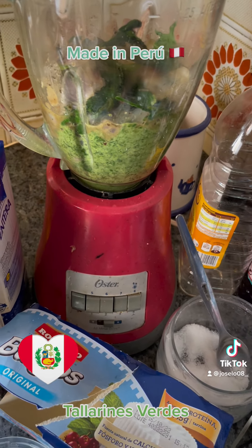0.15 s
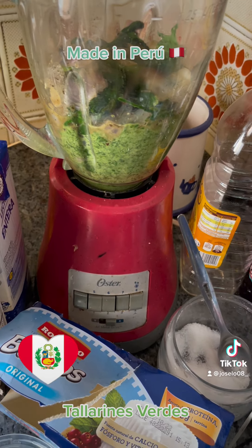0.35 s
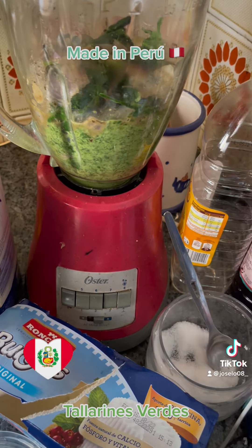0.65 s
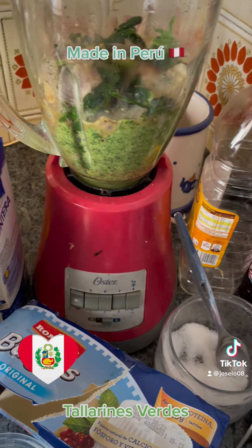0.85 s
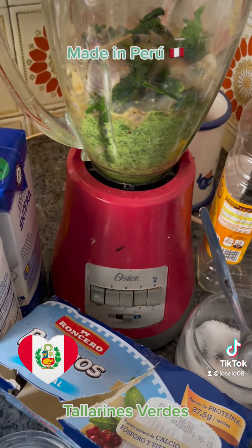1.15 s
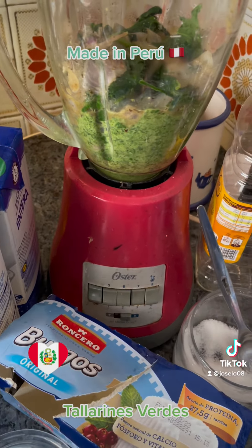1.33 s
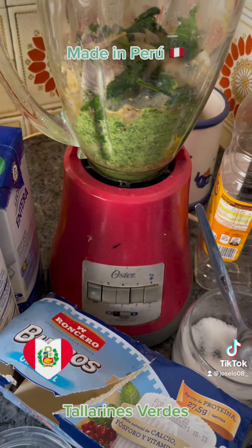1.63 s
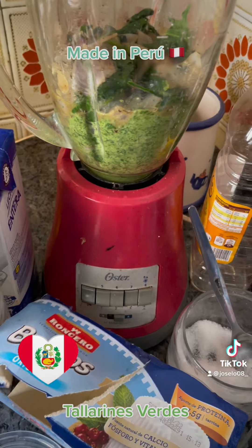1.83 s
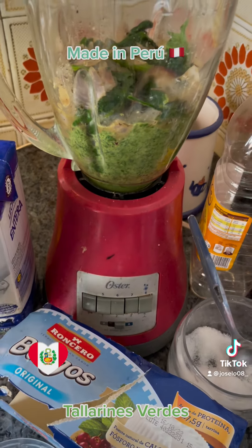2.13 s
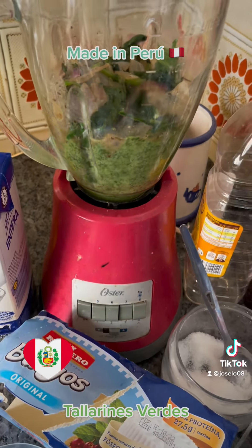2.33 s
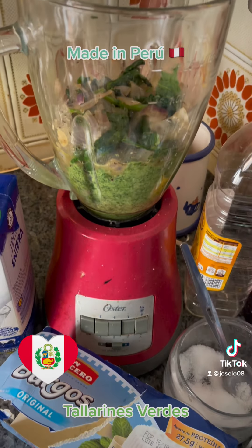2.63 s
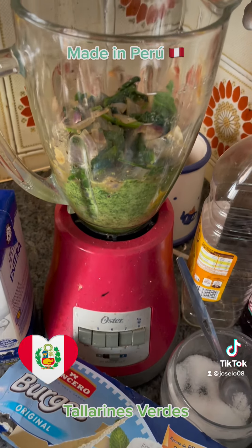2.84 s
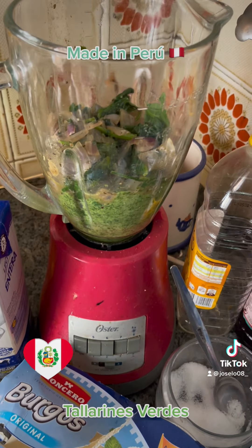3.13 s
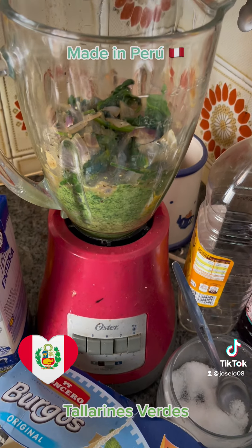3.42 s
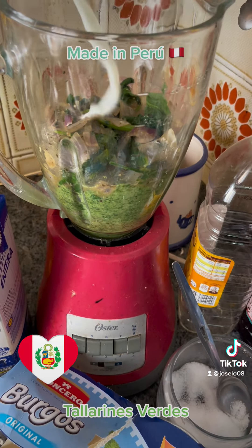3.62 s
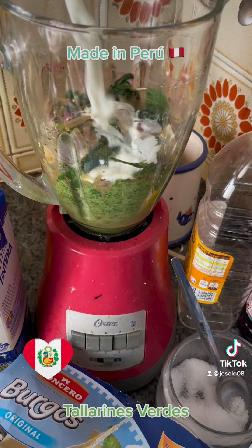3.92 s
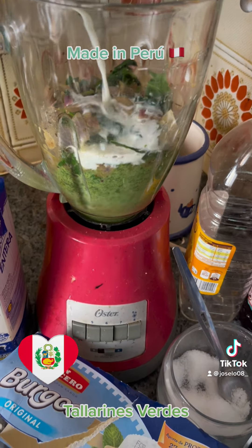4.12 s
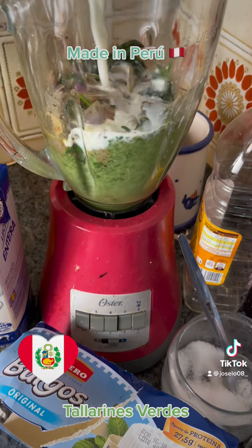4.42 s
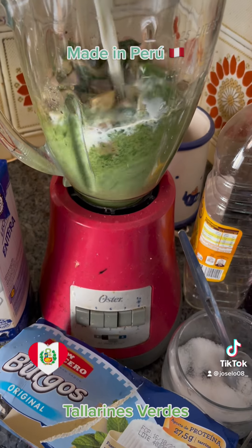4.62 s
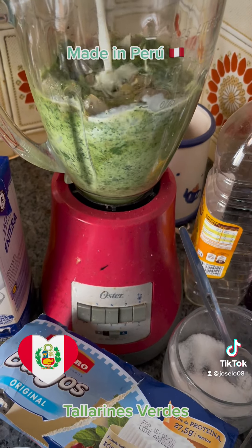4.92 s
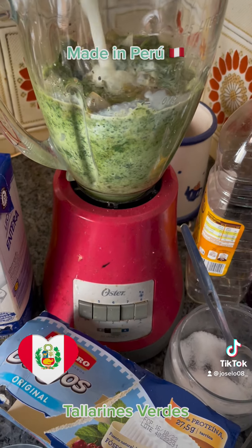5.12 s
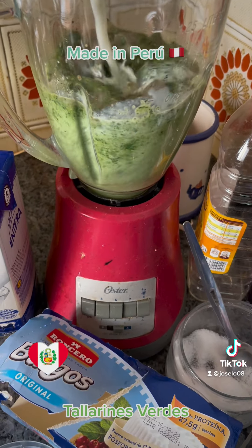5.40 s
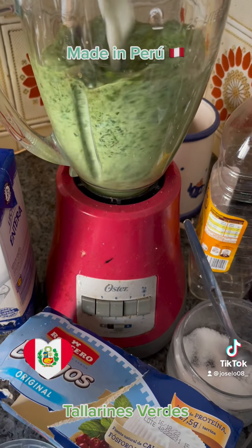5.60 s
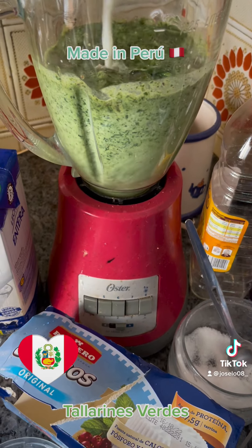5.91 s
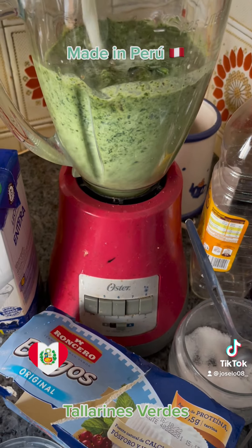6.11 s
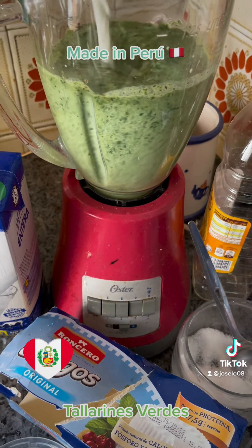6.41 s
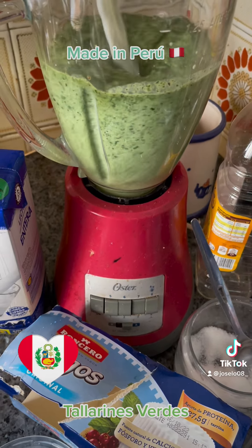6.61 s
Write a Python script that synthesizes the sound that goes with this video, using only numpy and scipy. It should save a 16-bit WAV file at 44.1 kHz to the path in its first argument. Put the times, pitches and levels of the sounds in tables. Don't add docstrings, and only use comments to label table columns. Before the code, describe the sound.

A blender already running close to a phone in a small tiled kitchen: loud rushing fan air, hollow housing roar and a high whine over low hum. It holds steady for almost four seconds, the whine becoming clearer midway. Then liquid goes in, the pitch drags down, wet sloshing swells, pockets of air gulp, and the motor climbs back, bogging down again twice before the end.

```python
import sys
import numpy as np
from scipy import signal
from scipy.fft import rfft, irfft
from scipy.io import wavfile
from scipy.ndimage import uniform_filter1d

SR = 44100
rng = np.random.default_rng(int(sys.argv[2]) if len(sys.argv) > 2 else 0)


def persist_wave(psi):
    counts = np.round(np.clip(psi, -1, 1) * 32767).astype(np.int16)
    wavfile.write(sys.argv[1], SR, np.atleast_2d(counts).T)


def how_loud(loudness_db):
    steps = np.asarray(loudness_db, float) / 20
    return 10 ** steps


N = 297675


def evened(x):
    return x / np.sqrt(np.mean(abs(x) ** 2) + 1e-20)


def read(points, hz):
    f, value = np.transpose(points)
    return np.interp(np.log(hz + 1), np.log(f + 1), value)


def columns(rows, t):
    s, *rest = np.transpose(rows)
    return [np.interp(t, s, c) for c in rest]


def step(t, at, takes):
    return .5 + .5 * np.tanh((t - at) / takes)


def wobble(width):
    smooth = uniform_filter1d(rng.standard_normal(N), width)
    return evened(uniform_filter1d(smooth, width))


# time_s, speed_hz
SPIN_UP = [
    (0.0, 266),
    (0.45, 275.3),
    (1.26, 278.6),
    (2.9, 281.3),
]
# time_s, speed_hz
SAG = [(3.77, 279), (3.88, 276.7), (3.97, 261.8), (4.18, 239), (4.48, 204), (4.65, 168.5), (4.9, 228),
       (5.04, 242.7), (5.21, 250.2), (5.43, 189), (5.56, 173), (5.71, 212), (5.83, 223.3), (5.96, 220.8),
       (6.15, 216.2), (6.27, 205.7), (6.63, 193.8), (6.75, 208)]


def speed(t):
    fine = np.arange(N) / SR
    speed_hz = columns(SPIN_UP + SAG, fine)[0]
    return np.interp(t, fine, uniform_filter1d(speed_hz, size=2800, mode="nearest"))


# centre_hz, width_hz, gain_db
SLOT_DIPS = [(2080, 150, -45), (2690, 60, -6), (3025, 75, -24), (3200, 50, -4), (3380, 120, -2)]


def slot_whine(angle, speed_hz, low):
    whine_hz = 12 * speed_hz
    dips_db = sum(db / (1 + (2 * (whine_hz - f) / width) ** 2) for f, width, db in SLOT_DIPS)
    level_db = -30.5 - 8 * low + dips_db
    return how_loud(level_db + 1.8 * wobble(1100)) * np.sin(12 * angle)


def bar_whine(angle, low):
    level_db = -46 + 6.5 * low - 2
    return how_loud(level_db + 2.5 * wobble(400)) * np.sin(24 * angle)


# speed_hz, level_db
SHAFT_PATH = [(172, -38.5), (195, -42), (215, -46.5), (245, -49), (265, -42.5), (280, -42.5)]


def shaft_shake(t, angle, speed_hz):
    gripped = sum(surge(t, start, release) for start, release, _, _ in BITES)
    load_db = 3 * gripped - 5.5 * slack(t, 0.095)
    level_db = read(SHAFT_PATH, speed_hz) + load_db
    return how_loud(level_db + 1.5 * wobble(900)) * np.sin(angle)


# time_s, level_db
HUM = [
    (0.0, -45),
    (2.69, -48.5),
    (4.68, -47),
    (4.75, -56),
    (4.98, -48),
    (5.57, -51),
    (5.68, -60),
    (6.3, -56),
    (6.75, -44),
]


def mains_hum(t):
    hum_hz = 101
    return how_loud(columns(HUM, t)[0] + 0.55 * wobble(2000)) * np.sin(2 * np.pi * hum_hz * t)


def motor():
    t = np.arange(N) / SR
    lift_s, lift_takes_s = 2.28, 0.078
    low = 1 - step(t, lift_s, lift_takes_s)
    speed_hz = speed(t)
    angle = 2 * np.pi * np.cumsum(speed_hz * (1 + .0007 * wobble(600))) / SR
    tones = slot_whine(angle, speed_hz, low) + bar_whine(angle, low)
    tones += shaft_shake(t, angle, speed_hz) + mains_hum(t)
    return np.sqrt(2) * tones


def colour(slope, modes, hz):
    bells_db = sum(db / (1 + (2 * (hz - f) / width) ** 2) for f, width, db in modes)
    gain = how_loud(read(slope, hz) + bells_db)
    return gain / np.sqrt(np.mean(gain ** 2))


# freq_hz, level_db
FAN = [(1500, -30), (3000, 2), (3600, -1), (5000, -8), (6000, -9.5), (6800, -3), (9000, -2.5), (11400, -1),
       (12500, -11), (13600, -19.5), (14500, -26.5)]
# centre_hz, width_hz, gain_db
FAN_MODES = [(3000, 110, -7), (3260, 230, 0), (3640, 170, 4.5), (4260, 120, 4), (4730, 98, 8),
             (5290, 1140, 8.5), (6480, 59, 9), (7030, 77, 2), (7525, 83, 3.5), (8120, 120, 2),
             (10110, 69, 2.5), (11180, 160, 0.5)]
# freq_hz, level_db
ROAR = [(25, -38), (50, -21.5), (150, -15.5), (350, -8.5), (600, -12.5), (800, -12.5), (1000, -6.5),
        (1700, -6), (2120, -6), (2400, -13), (4000, -7), (6000, -8), (14000, -52)]
# centre_hz, width_hz, gain_db
HOUSING = [(420.2, 54, 12), (722, 34, 11), (770, 95, -6), (1109, 60, 10), (1221, 88, 5), (1499, 58, 4),
           (1961, 62, 6.5), (2110, 45, 1)]
# freq_hz, level_db
HOWL = [(1900, -40), (2130, -25), (2220, 0.5), (2650, 0.5), (3000, -10.5), (3500, -6), (4200, -13),
        (5000, -29)]
# centre_hz, width_hz, gain_db
VENTS = [(2270, 85, 11), (2440, 71, 7.5), (2593, 40, 13.5), (2835, 49, 16.5), (3000, 98, -12),
         (3100, 60, -8), (3570, 220, 6.5)]


def air_power(t, hz):
    air_lag_s, full_hz = 0.032, 280
    ratio_db = 20 * np.log10(speed(t - air_lag_s) / full_hz)
    near_db = 3 * (1 - step(t, 0.53, 0.15))
    gusts = rng.standard_normal(len(t))
    fan_db = -34 + 2.83 * ratio_db + near_db + 10 + 0.27 * gusts
    hollow_db = -3.5 * slack(t, 0.49)
    roar_db = -33.5 + 0.73 * ratio_db + near_db + hollow_db + 4.5
    howl_db = -34 + 1.94 * ratio_db + near_db + 5
    power = (colour(FAN, FAN_MODES, hz) * how_loud(fan_db)) ** 2
    power += (colour(ROAR, HOUSING, hz) * how_loud(roar_db)) ** 2
    return power + (colour(HOWL, VENTS, hz) * how_loud(howl_db)) ** 2


# time_s, level_db
SIDE_VENT = [
    (0, -29),
    (.6, -33.5),
    (2.2, -32.5),
    (2.7, -42),
    (4.0, -38),
    (4.6, -45),
    (6.75, -52),
]
# freq_hz, level_db
SIDE_VENT_RING = [(3300, -35), (3430, -2), (3490, 1), (3550, -14), (3700, -43)]


def side_vent_power(t, hz):
    return (colour(SIDE_VENT_RING, [], hz) * how_loud(columns(SIDE_VENT, t)[0])) ** 2


# start_s, release_s, slosh_db, rumble_db
BITES = [
    (3.84, 4.682, -39.5, -47.5),
    (5.17, 5.56, -37, -39.5),
    (6.082, 6.65, -48.5, -45.5),
    (6.695, 6.8, -37, -47),
]


def surge(t, start, release):
    grip_s, let_go_s = .03, 0.027
    grown = how_loud(-12 * abs(release - t) / (release - start))
    return step(t, start, grip_s) * (1 - step(t, release, let_go_s)) * grown


def slack(t, lasts):
    let_go_s = 0.027
    return sum(step(t, release, let_go_s) * np.exp(-abs(t - release) / lasts) for _, release, _, _ in BITES)


# freq_hz, level_db
SLOSH = [(200, -16), (400, -9), (700, -7), (1000, -12), (1600, -14), (3000, -36)]
# centre_hz, width_hz, gain_db
JAR = [(420, 70, 8), (690, 80, 11), (920, 60, 3), (1480, 80, 5)]
# freq_hz, level_db
RUMBLE = [(30, -40), (45, -25), (70, -3.5), (115, -3.5), (200, -1), (300, -5), (500, -39)]


def churn_power(t, hz):
    pour_s = 3.72
    slosh = how_loud(-61.5) * step(t, pour_s, .05)
    rumble = how_loud(-53.5) * step(t, pour_s, .2)
    for start, release, slosh_db, rumble_db in BITES:
        grip = surge(t, start, release)
        slosh = slosh + how_loud(slosh_db) * grip
        rumble = rumble + how_loud(rumble_db) * grip
    lumps = evened(uniform_filter1d(rng.standard_normal(len(t)), size=3))
    power = (colour(SLOSH, JAR, hz) * slosh * how_loud(2.5 + 2.0 * lumps)) ** 2
    return power + (colour(RUMBLE, [], hz) * rumble * how_loud(0.5 + 1.8 * lumps)) ** 2


# start_s, level_db, pitch_hz, t60_s
GULPS = [(3.875, -25, 680, .09), (4.57, -22, 680, .05), (4.61, -26, 690, .09), (4.648, -24, 1480, .06),
         (4.656, -14, 430, .05), (4.657, -17, 700, .045), (4.68, -20, 125, .07), (5.15, -25, 420, .09),
         (5.47, -25, 700, .05), (5.541, -14, 720, .02), (5.555, -26, 105, .15), (5.632, -24, 400, .07),
         (6.628, -24, 870, .05), (6.63, -23, 115, .14), (6.71, -29, 930, .09)]


def gulps():
    out = np.zeros(N + SR)
    t = np.arange(8000) / SR
    for start, db, hz, t60 in GULPS:
        ring = np.sin(2 * np.pi * hz * (t + 1.0 * t ** 2))
        splash = uniform_filter1d(rng.standard_normal(len(t)), size=14) * np.exp(-t / .006)
        envelope = how_loud(db - 1.5 - 60 * t / t60) * (1 - np.exp(-t / .002))
        out[round(start * SR):][:len(t)] += envelope * (ring + 1.5 * splash)
    return out[:N]


# freq_hz, left_lead_rad
LEAD = [(0, 0), (2000, .05), (2240, .65), (3000, 1.0), (3300, .6), (4000, .65), (4750, 2.92), (5050, 3.42),
        (5700, 6.15), (6250, 6.4), (8350, 9.03), (8750, 9.4), (9600, 9.46), (9750, 10.0), (11550, 11.7),
        (11900, 12.5), (15000, 12.57)]
# freq_hz, coherence (0 to 1)
ALIKE = [(150, .9995), (500, .97), (860, .86), (1200, .95), (1400, .996), (2000, .996), (2400, .9),
         (3300, .5), (4600, .72), (4750, .96), (5050, .97), (5200, .72), (5750, .995), (6250, .995),
         (6500, .84), (8050, .76), (8400, .97), (8750, .998), (9600, .998), (9750, .85), (11900, .86),
         (12200, .998)]
# freq_hz, left_over_right_db
TILT = [(150, 0), (300, -1), (520, -1), (860, 2), (1200, 1), (1500, 0), (2600, -.5), (3300, 1.5),
        (4500, -1), (4900, 0), (5400, .7), (5700, 0)]


def ports(z, other, hz):
    alike = np.clip(read(ALIKE, hz), 0, 1)
    turn = np.exp(.5j * np.interp(hz, *np.transpose(LEAD)))
    tilt = how_loud(read(TILT, hz) / 2)
    right = alike * z + np.sqrt(1 - alike ** 2) * other
    return np.array([z * turn * tilt, right / turn / tilt])


def turbulence():
    frames = N // 256 + 5
    hz = np.fft.rfftfreq(1024, 1 / SR)[:, None]
    t = np.arange(frames) * 256 / SR
    a, b, c, d, patches = rng.standard_normal((frames, 513, 5)).T
    patches = uniform_filter1d(patches, size=14, axis=0)
    patches = evened(uniform_filter1d(patches, size=10, axis=1))
    power = air_power(t, hz) + side_vent_power(t, hz) + churn_power(t, hz)
    ripple = evened(uniform_filter1d(rng.standard_normal(513), size=2))[:, None]
    size = np.sqrt(power) * how_loud(.7 * patches + 1.3 * ripple * (hz > 3800))
    noise, other = a + 1j * b, c + 1j * d
    unit = np.sqrt(np.mean(signal.istft(noise, nperseg=1024, noverlap=768)[1] ** 2))
    z = ports(size * noise, size * other, hz)
    return signal.istft(z, nperseg=1024, noverlap=768)[1][:, :N] / unit


def kitchen(x):
    k = np.arange(9000)
    sparse = rng.choice([-1., 1.], 9000) * (rng.random(9000) < .05)
    taps = sparse * how_loud(-60 * k / SR / 0.1)
    return signal.oaconvolve(x, taps / np.linalg.norm(taps))[:N]


def scene():
    near = motor() + gulps()
    room = .8 * near + .5 * kitchen(near)
    z = ports(rfft(near), rfft(room), np.fft.rfftfreq(N, 1 / SR))
    return irfft(z, N) + turbulence()


def band_limit(x):
    return signal.sosfilt(signal.butter(12, 14940, fs=SR, output="sos"), x)


# freq_hz, gain_db
MICROPHONE = [(25, -17), (50, 0), (14100, 0), (15000, 0)]


def record(dry):
    gain = how_loud(read(MICROPHONE, np.fft.rfftfreq(N, 1 / SR)))
    heard = irfft(rfft(dry) * gain, N)
    return band_limit(heard)


dry = scene()
out = record(dry)
persist_wave(out)
```